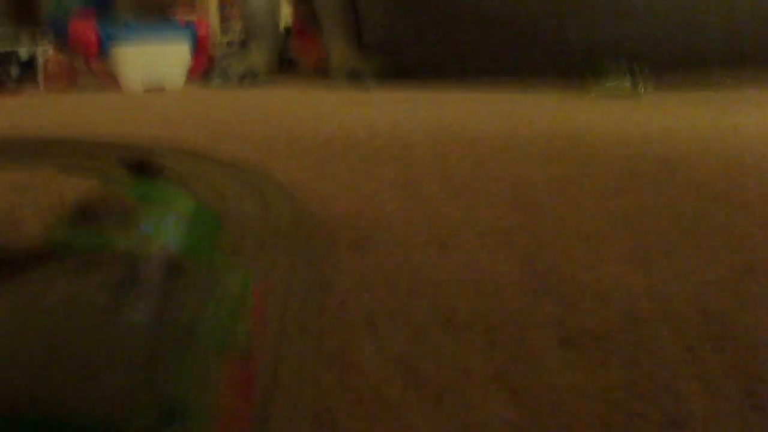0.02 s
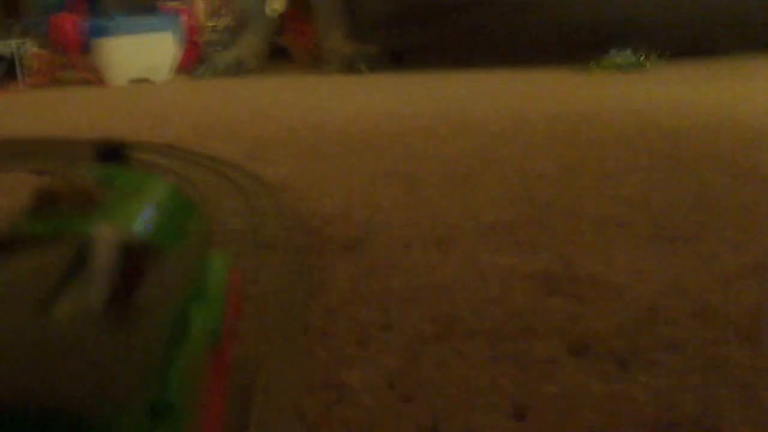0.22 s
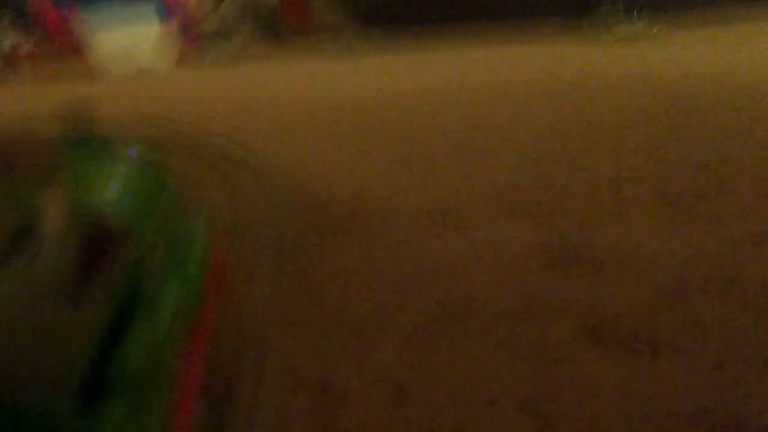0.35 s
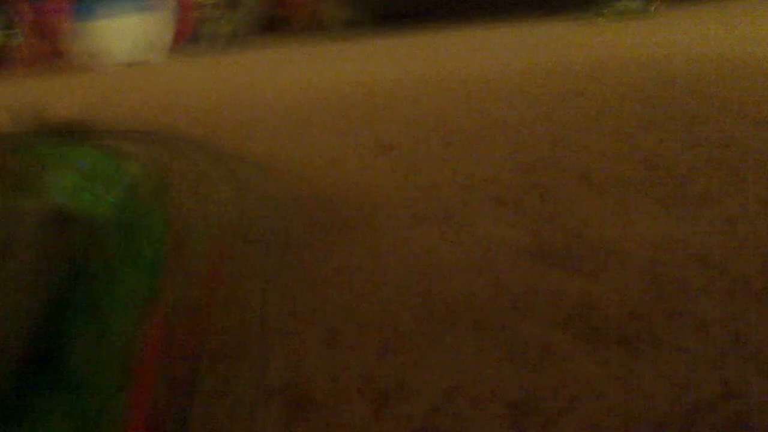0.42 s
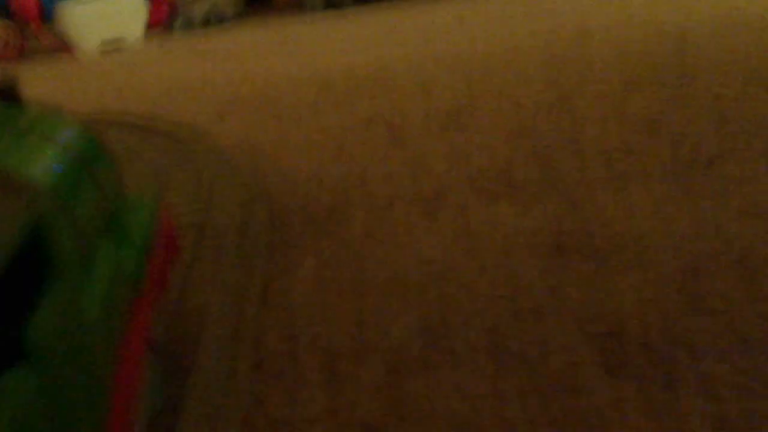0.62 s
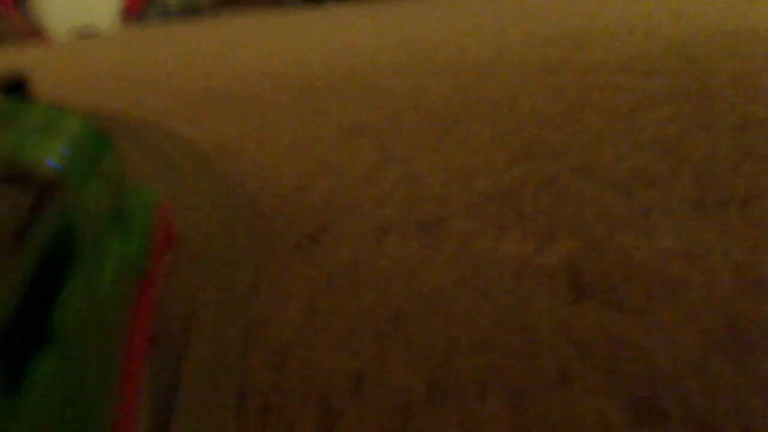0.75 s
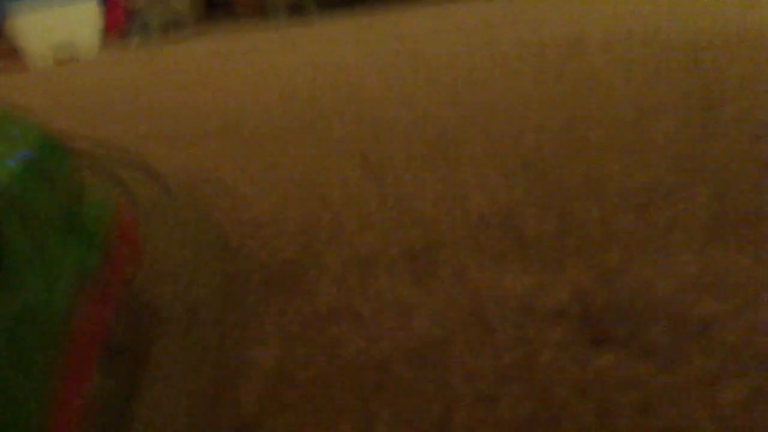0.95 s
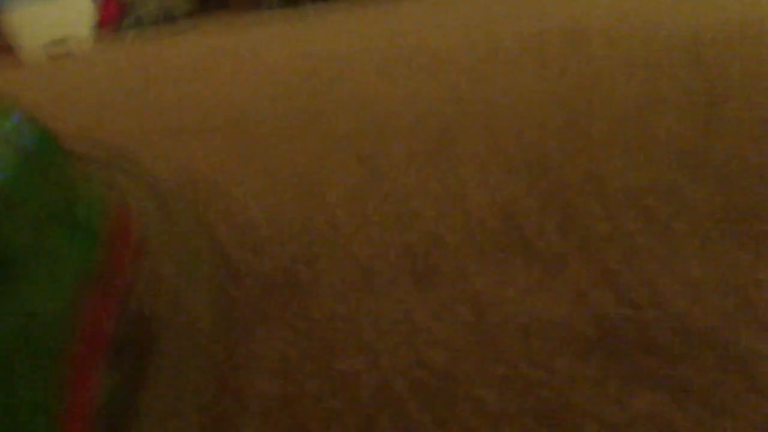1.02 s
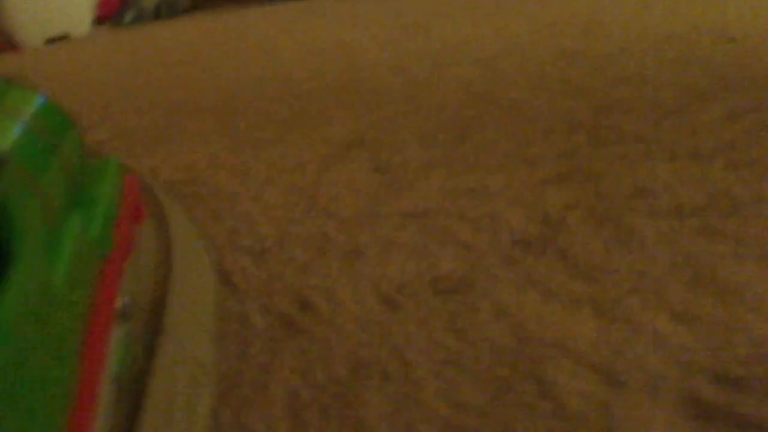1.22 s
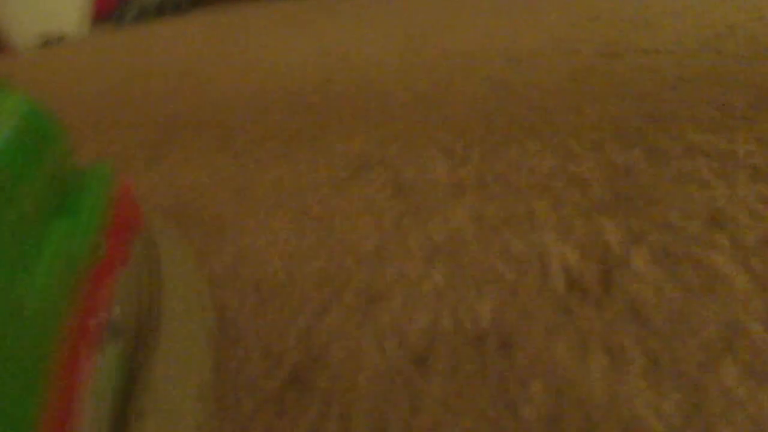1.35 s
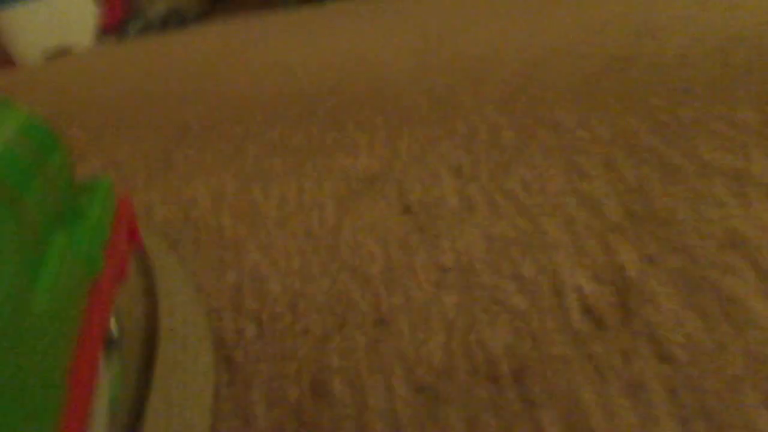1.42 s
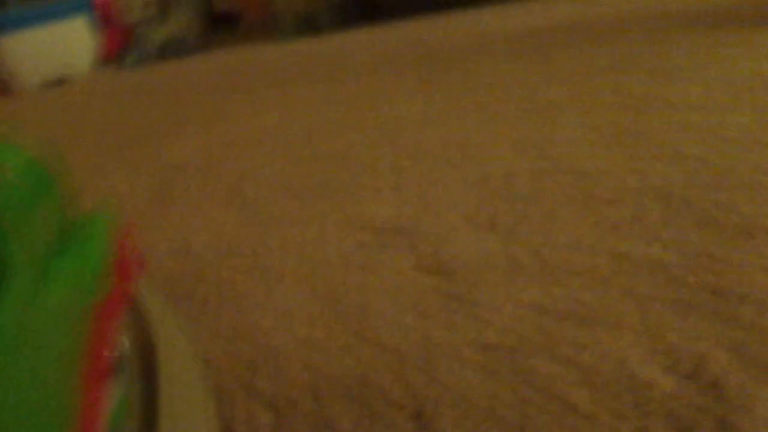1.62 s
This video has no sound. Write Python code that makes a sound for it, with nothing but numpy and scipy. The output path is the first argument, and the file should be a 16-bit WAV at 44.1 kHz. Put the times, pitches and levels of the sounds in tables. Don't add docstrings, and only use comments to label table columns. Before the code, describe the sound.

A small battery toy train rattles over carpet indoors, heard from a microphone on board. After a faint whir and brief scrape, a very loud bright snap hits at 0.05 seconds with a tiny bounce. From 0.13, quick hollow plastic knocks, soft thuds and clacks chatter unevenly, with a stronger knock at 0.68 and sharp ticks near 1.03 and 1.25. Knocks become sparser after 1.3 over faint gear hiss.

```python
import sys
import numpy as np
from scipy import signal
from scipy.fft import rfft, irfft, next_fast_len
from scipy.io import wavfile
from scipy.ndimage import map_coordinates

SR = 44100
rng = np.random.default_rng(int(sys.argv[2]) if len(sys.argv) > 2 else 0)


def put_to_file(sound):
    columns = np.atleast_2d(sound).T
    safe = np.clip(columns, -1, 1)
    whole_steps = np.round(safe * 32767)
    wavfile.write(sys.argv[1], SR, whole_steps.astype(np.int16))


def elevation(decibels):
    levels = np.asarray(decibels, float)
    return 10 ** (levels / 20)


N = 74970

# start_s, peak_db, pitch_hz
SHELL_KNOCKS = [(0.147, -23, 899), (0.183, -26.5, 972), (0.226, -30, 880), (0.245, -25.5, 986),
                (0.302, -25.5, 893), (0.335, -24, 916), (0.362, -22, 940), (0.391, -27, 787),
                (0.425, -28.5, 893), (0.454, -21, 932), (0.463, -27.5, 922), (0.487, -28, 990),
                (0.517, -26.5, 919), (0.535, -24.5, 720), (0.579, -27.5, 824), (0.648, -23.5, 916),
                (0.6822, -12.5, 909), (0.75, -28.5, 907), (0.801, -20.5, 908), (0.878, -23.5, 874),
                (0.912, -24, 870), (0.934, -44, 820), (0.964, -25, 893), (0.983, -33, 943),
                (1.066, -34.5, 908), (1.114, -24.5, 896), (1.152, -24.5, 770), (1.26, -26, 862),
                (1.317, -26.5, 868), (1.521, -24, 970), (0.131, -37, 829), (0.268, -43, 930),
                (0.471, -26, 924), (0.557, -22, 869), (0.586, -64, 857), (0.623, -42, 670),
                (0.658, -30, 857), (0.722, -33, 746), (0.785, -27, 907), (0.829, -41, 943),
                (0.838, -28.5, 901), (0.89, -42, 910), (0.923, -27, 892), (1.034, -32, 762),
                (1.089, -33, 876), (1.124, -38, 840), (1.135, -66, 880), (1.163, -47, 785),
                (1.232, -32, 943), (1.328, -32.5, 880), (1.338, -51, 940), (1.502, -49, 940),
                (1.555, -37.5, 1030), (1.643, -34, 727)]
# start_s, peak_db, pitch_hz
CHASSIS_THUDS = [(0.128, -33.5, 396), (0.193, -43, 347), (0.214, -34, 410), (0.304, -34, 223),
                 (0.355, -26.5, 328.3), (0.385, -30, 366), (0.419, -38, 335), (0.455, -27, 370),
                 (0.535, -27, 354.4), (0.626, -27.5, 418), (0.697, -52, 420), (0.72, -51, 194),
                 (0.758, -31.5, 390), (0.833, -51, 239), (0.87, -31.5, 342), (0.909, -34.5, 404),
                 (0.961, -28, 370), (1.025, -28, 389), (1.092, -28.5, 379), (1.149, -40, 282),
                 (1.232, -40, 459), (1.288, -28, 404), (1.314, -29, 424), (1.395, -31, 404),
                 (1.523, -36, 430), (1.549, -40, 220), (1.612, -37.5, 279.4), (0.181, -40, 200),
                 (0.58, -44.5, 247), (0.68, -38, 404), (0.735, -44.5, 263), (0.78, -57, 456),
                 (0.93, -50, 340), (1.112, -35.5, 351.5), (1.335, -46.5, 393), (1.415, -48, 283),
                 (1.451, -77, 432), (1.64, -34.5, 260)]


def unit(x):
    return x / np.sqrt(np.mean(x ** 2) + 1e-20)


def wobble(rate_hz):
    knots = rng.standard_normal(int(N * rate_hz / SR) + 4)
    return map_coordinates(knots, [np.arange(N) * rate_hz / SR])


def filtered(x, response):
    size = next_fast_len(len(x) + 8192)
    spectrum = rfft(x, size) * response(np.fft.rfftfreq(size, 1 / SR))
    return irfft(spectrum, size)[:len(x)]


def body(modes):
    def response(f):
        total = 0
        for k, (hz, width_hz, db) in enumerate(modes):
            resonance = 1j * f * width_hz / (hz * hz - f * f + 1j * f * width_hz)
            total = total + (-1) ** k * elevation(db) * resonance
        return total
    return response


def lowpass(f, hz, order):
    return 1 / (1 + (f / hz) ** order)


def highpass(f, hz, order):
    return 1 / (1 + (hz / (f + 1)) ** order)


def add(out, start_s, x):
    part = out[round(start_s * SR):][:len(x)]
    part += x[:len(part)]


def swell(t, rise_s, t60_s):
    rise = 1 - np.exp(-(t / rise_s) ** 2)
    return rise * elevation(-60 * np.maximum(t - rise_s, 0) / t60_s)


def grains(rate_hz, spread_db):
    size = elevation(spread_db * rng.uniform(-2.8, 1, N)) * np.sign(rng.standard_normal(N))
    return unit(size * (rng.random(N) < rate_hz / SR))


def jolts(rows, t60_s):
    out, t = np.zeros(N), np.arange(SR // 3) / SR
    for start_s, db, _ in rows:
        add(out, start_s - 0.006, elevation(0.64 * db - 10) * swell(t, 0.0057, t60_s))
    return out


def rings(rows, rise_cycles, rough, width, tail_db, tail, beat, t60_s, crack_db=-60):
    out, t = np.zeros(N), np.arange(SR // 5) / SR
    draws = rng.standard_normal((len(rows), len(t)))
    for (start_s, db, hz), noise in zip(rows, draws):
        band = unit(filtered(noise, lambda f: body([(hz, width * hz, 0)])(f) ** 2))
        beating = (1 - beat * np.cos(2 * np.pi * 0.203 * hz * t)) / (1 + beat)
        tone = np.sin(2 * np.pi * hz * t) * beating + rough * band
        ring = tone * swell(t, rise_cycles / hz, t60_s / tail)
        after_rattle = elevation(tail_db) * band * swell(t, 0.008, t60_s)
        crack = unit(filtered(noise, body([(4000, 6000, 0)]))) * swell(t, 0.0004, 0.005)
        add(out, start_s, elevation(db) * (ring + after_rattle + elevation(crack_db) * crack))
    return out


def motor():
    # start_s, level_db
    motor_levels = [
        (0.0, -46.5),
        (0.44, -54),
        (1.7, -50),
    ]
    # pitch_hz, width_hz, level_db
    gearbox_modes = [(2410, 570, -7), (2850, 124, 3), (3189, 210, -2), (4260, 350, -4), (5640, 800, 1.5),
                     (9430, 1200, -4), (12000, 1300, -12)]
    # pitch_hz, gain_db
    hiss_curve = [(24, -68), (40, -31), (406, -28), (656, 2.5), (1430, 1), (1800, 4), (2900, 0),
                  (9240, -12.5), (16500, -14)]
    t = np.arange(N) / SR
    level_db = np.interp(t, *np.transpose(motor_levels))
    shaft_hz, speedup_hz_per_s = 64.6, 4.17
    turns = shaft_hz * t + speedup_hz_per_s * t ** 2 / 2
    phase = 2 * np.pi * (turns + 0.23 * wobble(12.2))
    pulse = elevation(4.5 * np.sin(phase) + 3.5 * wobble(120))

    hz, gain_db = np.transpose(hiss_curve)

    def hiss_response(f):
        return elevation(np.interp(np.log(f + 1), np.log(hz), gain_db)) * lowpass(f, 6000, 2)

    def teeth_response(f):
        return body(gearbox_modes[4:])(f) * highpass(f, 3800, 4)

    hiss = unit(filtered(rng.standard_normal(N), hiss_response))
    mesh = rng.standard_normal(N) + 0.5 * grains(1200, 25)
    gears = unit(filtered(mesh, body(gearbox_modes[:4])))
    teeth = unit(filtered(pulse * rng.standard_normal(N), teeth_response))

    gears_gain = elevation(level_db + 2.0 * wobble(40.17))
    teeth_gain = elevation(-55.5 + 0.84 * t + 0.74 * wobble(15.05))
    hiss_gain = elevation(0.5 * level_db - 26.5 + 4.2 * wobble(30.12))
    return gears_gain * gears + teeth_gain * teeth + hiss_gain * hiss


def whine():
    # start_s, pitch_hz, level_db
    whine_track = [(0, 3296, -70), (.014, 3260, -49), (0.041, 3217, -57), (.075, 3185, -52),
                   (.125, 3265, -64), (0.136, 3190, -41), (0.167, 3248, -42), (0.186, 3343, -62),
                   (.25, 3190, -58), (.3, 3200, -58.5), (.6, 3220, -59.5), (1.7, 3300, -60)]
    s, hz, db = np.transpose(whine_track)
    t = np.arange(N) / SR
    pitch_hz = np.interp(t, s, hz) + 70 * wobble(200)
    level_db = np.interp(t, s, db) + 3 + 4.2 * wobble(78)
    return elevation(level_db) * np.sin(2 * np.pi * np.cumsum(pitch_hz) / SR)


def chatter():
    # pitch_hz, width_hz, level_db
    shell_modes = [
        (228, 253, -10.5),
        (302.3, 27.7, -2),
        (404, 26.3, -1),
        (576, 24, -6.5),
        (735, 48, -8.5),
        (887.4, 46, -2),
        (1016, 93, -6.5),
    ]
    upper = jolts(SHELL_KNOCKS, 0.11) + elevation(-49.0)
    lower = jolts(CHASSIS_THUDS, 0.19) + elevation(-51)

    def upper_response(f):
        return body(shell_modes[3:])(f) * lowpass(f, 1250, 6) * highpass(f, 450, 4)

    def lower_response(f):
        return body(shell_modes[:3])(f) * lowpass(f, 520, 6)

    fizz_grains = grains(4000, 17) * elevation(3.5 * wobble(120))
    fizz = unit(filtered(fizz_grains, body([(1900, 3300, 8), (6000, 5000, 3.0)])))
    upper_ring = unit(filtered(grains(700, 4), upper_response))
    lower_ring = unit(filtered(grains(250, 1.03), lower_response))
    shell = elevation(-13) * upper * upper_ring + elevation(-10.5) * lower * lower_ring
    return shell + elevation(-25.5) * (upper + lower) * fizz


def scrapes():
    # start_s, length_s, level_db, pitch_hz, width_hz
    rubs = [(.04, .008, -46, 12000, 2000), (0.047, 0.0099, -43.5, 2190, 900),
            (0.057, 0.017, -38.5, 2906, 100), (.002, 0.042, -46, 360, 154), (0.037, 0.038, -43, 956, 490),
            (0.39, 0.0031, -38.5, 7660, 2500), (0.452, 0.023, -38.5, 7540, 6000),
            (0.683, .022, -48, 6300, 2980), (0.08, .018, -52, 9000, 6000), (0.56, 0.019, -54, 9100, 3400),
            (0.733, 0.047, -57, 14000, 2500), (1.046, 0.016, -56, 6000, 1926),
            (1.269, 0.005, -44, 4140, 3800), (1.312, 0.036, -46.5, 5870, 1230)]
    out, t = np.zeros(N), np.arange(SR // 10) / SR
    draws = rng.standard_normal((len(rubs), len(t)))
    for (start_s, length_s, db, hz, width_hz), noise in zip(rubs, draws):
        band = unit(filtered(noise, lambda f: body([(hz, width_hz, 0)])(f) ** 2))
        shape = np.sqrt(np.sin(np.pi * np.clip(t / length_s, 0, 1)) + 1e-9)
        grip_db = 3 * wobble(300)[round(start_s * SR):][:len(t)]
        add(out, start_s, elevation(db + grip_db) * band * shape)
    return out


def bumps():
    # start_s, peak_db, pitch_hz
    low_pushes = [(0.05, -46.5, 120), (0.208, -38.5, 180), (0.294, -31.5, 170), (0.354, -29, 186),
                  (0.379, -41, 112), (0.539, -35, 189), (0.708, -35.5, 139), (0.748, -50, 188),
                  (1.019, -39, 176), (1.083, -34.5, 178), (1.402, -48.5, 181), (1.537, -39, 190)]
    return rings(low_pushes, rise_cycles=0.58, rough=0.52, width=0.84,
                 tail_db=-13, tail=1, beat=0, t60_s=0.073)


def latch():
    # start_s, level_db, t60_s
    snaps = [
        (0.0532, -5, 0.012),
        (0.0684, -16.5, 0.004),
        (0.0765, -36, 0.006),
    ]
    # pitch_hz, width_hz, level_db
    latch_modes = [(3600, 900, -10), (4350, 800, -5), (5450, 900, -4), (6500, 900, -12), (7500, 800, -7),
                   (8500, 900, 0), (10600, 1600, -1), (12200, 1600, -6), (14300, 2500, -11)]
    out, t = np.zeros(N), np.arange(SR // 8) / SR

    def bright_response(f):
        return body(latch_modes)(f) * highpass(f, 3000, 8)

    for start_s, db, t60_s in snaps:
        ring = np.zeros(len(t))
        for hz, _, mode_db in latch_modes:
            ring += elevation(mode_db) * np.sin(2 * np.pi * (hz * t + rng.random()))
        noise = unit(filtered(rng.standard_normal(len(t)), bright_response))
        dull = unit(filtered(noise, lambda f: lowpass(f, 4500, 2)))
        crack = (ring + 0.7 * noise) * swell(t, 0.0011, t60_s)
        after_rattle = elevation(-19) * dull * swell(t, 0.00067, 0.065)
        add(out, start_s, elevation(db) * (crack + after_rattle))
    return filtered(out, lambda f: highpass(f, 2600, 6))


def thuds():
    return rings(CHASSIS_THUDS, rise_cycles=0.8, rough=0.2, width=1.0,
                 tail_db=-12.5, tail=1.0, beat=0.2, t60_s=0.099)


def knocks():
    return rings(SHELL_KNOCKS, rise_cycles=0.55, rough=0.12, width=0.41,
                 tail_db=-27.5, tail=0.81, beat=0.49, t60_s=0.048, crack_db=-26.5)


def ticks():
    # start_s, peak_db, pitch_hz
    part_ticks = [(0.197, -26, 5300), (0.379, -29, 7760), (0.4612, -27.5, 6000), (0.6903, -37, 5840),
                  (0.8748, -30, 5860), (0.985, -36.5, 4260), (1.0292, -16.5, 5270), (1.0496, -38, 5840),
                  (1.133, -34, 5130), (1.1502, -33, 4070), (1.1777, -42, 5070), (1.2508, -23.5, 5270),
                  (1.2606, -30, 4770), (1.3024, -40, 5940), (1.397, -31, 5380), (1.4113, -29, 5970),
                  (0.4805, -41, 8940), (0.4315, -37, 6000), (0.5415, -37, 6000), (0.5775, -43, 5840),
                  (0.583, -36, 6000), (1.2825, -52, 5500), (1.3135, -35, 5170), (0.1825, -34, 5770),
                  (0.3035, -46, 5000)]
    return rings(part_ticks, rise_cycles=6.0, rough=0.45, width=0.3,
                 tail_db=-19, tail=8, beat=0, t60_s=0.05, crack_db=-9)


def clacks():
    # start_s, peak_db, pitch_hz
    axle_clacks = [(0.1969, -16.5, 1850), (0.2141, -20.5, 1540), (0.259, -24.5, 1900),
                   (0.3608, -25.5, 1920), (0.4655, -24.5, 1370), (1.0293, -27, 1465), (1.1533, -31.5, 2020),
                   (1.6536, -27, 1260), (0.246, -29, 1910), (0.3024, -32, 2860), (0.4231, -32, 2660),
                   (0.461, -28, 2040), (0.472, -31.5, 2270), (0.682, -42, 1880), (0.7489, -35, 1907),
                   (0.9329, -52, 2620), (1.0896, -44, 3080), (1.2592, -28.5, 3080), (0.586, -32, 3200)]
    return rings(axle_clacks, rise_cycles=1.0, rough=0.32, width=0.29,
                 tail_db=-15, tail=3.95, beat=0, t60_s=0.027, crack_db=-19.5)


def scene():
    t = np.arange(N) / SR
    recover_s = 0.128
    duck = elevation(np.interp(t, [0.056, 0.12, 0.12001, recover_s], [0, -10, -4, 0]))
    chatter_gain = np.where(t < recover_s, 0.4, 1)
    running = duck * motor() + whine() + chatter_gain * chatter() + scrapes()
    impacts = bumps() + latch() + thuds() + knocks() + ticks() + clacks()
    return (running + impacts)[None]


def roll_off(x):
    return signal.sosfilt(signal.butter(12, 16840, fs=SR, output="sos"), x)


def record(dry):
    def microphone(f):
        return (1j * f / (70 + 1j * f)) ** 2 * lowpass(f, 15800, 20)

    mix = filtered(dry[0], microphone)[None]
    return roll_off(mix)


dry = scene()
out = record(dry)
put_to_file(out)
```